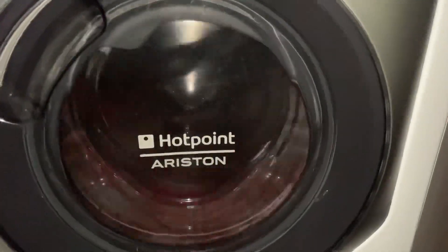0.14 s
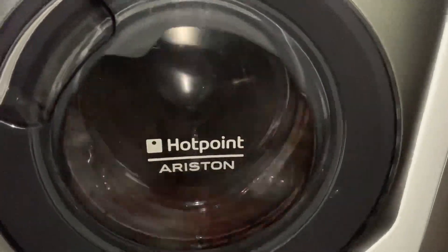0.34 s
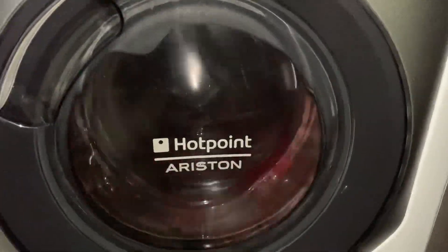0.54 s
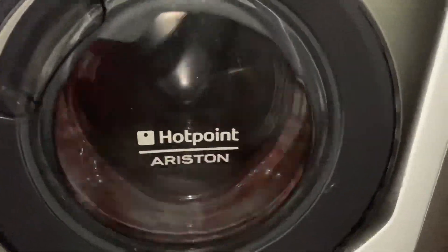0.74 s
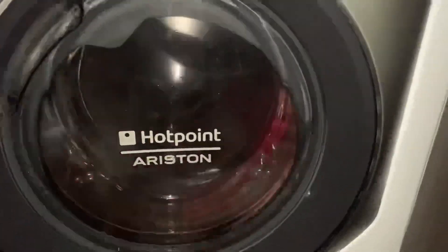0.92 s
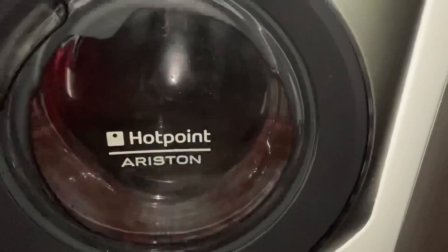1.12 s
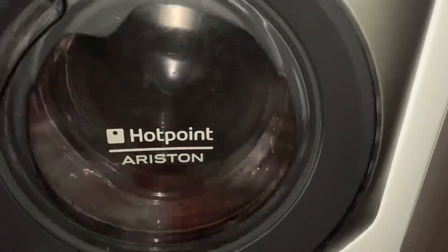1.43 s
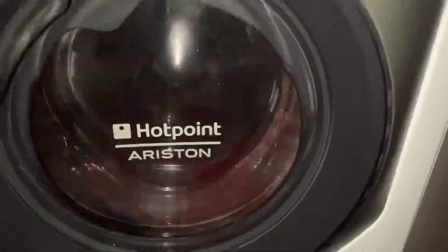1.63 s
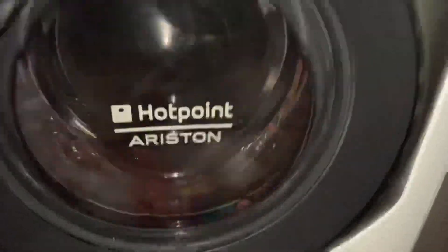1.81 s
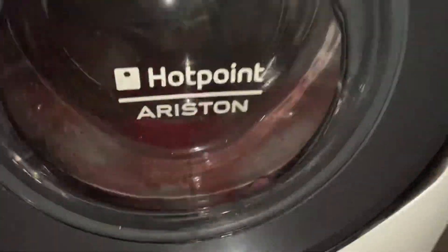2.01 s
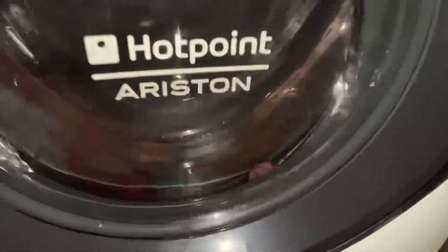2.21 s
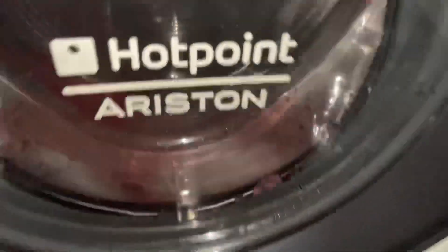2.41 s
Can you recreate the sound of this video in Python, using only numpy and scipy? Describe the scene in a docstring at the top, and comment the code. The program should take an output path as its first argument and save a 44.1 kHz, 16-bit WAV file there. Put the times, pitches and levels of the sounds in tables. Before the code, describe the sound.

Close at the door of a washing machine at home, a steady electric hum, thin whine and dull tub booms run under watery hiss, with an early metallic knock and tick, then sloshing swells and short splashes.

```python
"""A front-loading washing machine turns its drum, heard from just outside the door.
From the start the mains-fed motor hums and whines in thin tones and buzzes as noise bursts through the cabinet,
the tub rumbles and booms on low resonances as the wet load shifts, and patchy noise churns, runs and hisses.
Half a second in, something hard knocks the ringing drum, then ticks once more before the water gets lively.
From one second the laundry swishes round in swells of noise, water splashes in short sprays, and a last tick falls."""
import sys
import numpy as np
from scipy import signal
from scipy.fft import rfft, irfft, next_fast_len
from scipy.io import wavfile
from scipy.ndimage import uniform_filter1d, map_coordinates

SR = 44100
rng = np.random.default_rng(int(sys.argv[2]) if len(sys.argv) > 2 else 0)


def bounce(signal):
    """Save signal as a 16-bit WAV file at the path given by the first command-line argument."""
    frames = np.transpose(np.atleast_2d(signal))
    limited = np.clip(frames, -1, 1)
    pcm = np.round(limited * 32767).astype(np.int16)
    wavfile.write(sys.argv[1], SR, pcm)


N = 112455

MAINS_HZ = 50.03
# weak partials of the motor hum, before they follow the buzz: mains_multiple, level_db
WEAK_HUM = [(1, -71), (2, -74), (5, -54.5), (6, -52.5), (7, -64.5), (10, -59.5), (11, -57.5), (12, -54),
            (13, -59.5)]
# the two strongest hum partials: time_s, third_level_db, fourth_level_db
STRONG_HUM = [(0, -48, -36.5), (.38, -43, -34.5), (.56, -49, -35.5), (.65, -36, -44), (.73, -45, -45.5),
              (.8, -42, -58), (0.979, -44.5, -64.5), (1.07, -37, -39), (1.16, -52, -46.5),
              (1.3, -36.5, -42), (1.42, -46, -42), (1.7, -42, -45), (1.8, -33, -39), (1.93, -48, -42),
              (2.04, -33.5, -46), (2.16, -46.5, -41), (2.27, -33, -39.5), (2.55, -45, -40.5)]
# hum partial that rings in a panel, coming and going with the load: time_s, level_db
PANEL_SING = [(0, -47), (.08, -47), (.15, -54), (.22, -54), (.29, -53), (.44, -43.5), (.56, -63),
              (.69, -56), (.8, -47.5), (.95, -57.5), (1.07, -63), (1.24, -50.5), (1.32, -62.5),
              (1.42, -43.5), (1.56, -44.5), (1.63, -54), (1.74, -59), (1.86, -43.5), (1.94, -58),
              (2.01, -44.5), (2.1, -59), (2.22, -60.5), (2.42, -46), (2.55, -52)]
SING_MULTIPLE = 14  # of the mains
HUM_FOLLOWS = 0.81  # dB of weak hum for each dB of buzz
# unsteadiness of each kind of tone, in level (dB) and phase (radians)
HUM_WAVER_DB, HUM_WAVER_RAD = 3.5, 0.37
STRONG_WAVER_DB, STRONG_WAVER_RAD = 1.24, 0.068
SING_WAVER_DB, SING_WAVER_RAD = 1.2, 0.35
WHINE_WAVER_DB, WHINE_WAVER_RAD = 6.5, 0.45

# thin lines of the motor whine, before its overall level: pitch_hz, level_db
WHINE_LINES = [(904.4, -57.5), (958.2, -71), (1098, -70.5), (1180, -63), (1351, -64), (1389, -65),
               (1523, -61), (1685, -65.5), (2153, -66.5)]
# gain over all the whine lines: time_s, gain_db
WHINE_GAIN = [(0, 1), (.55, 3.5), (.85, -10), (1.1, -2.5), (1.6, -2), (1.92, -4), (2.2, -3), (2.55, -12)]

# motor buzz before its trim: time_s, level_db
BUZZ_LEVEL = [(0, -38), (.2, -37), (.3, -46.5), (.49, -39), (.56, -44), (.72, -44), (.785, -45.5),
              (.94, -47.5), (1.08, -41.5), (1.26, -42.5), (1.33, -48.5), (1.4, -43), (1.55, -42.5),
              (1.63, -42.5), (1.82, -43.5), (2.02, -43.5), (2.24, -44), (2.3, -41), (2.55, -42)]
BUZZ_TRIM_DB, BUZZ_SHARPNESS = -1.35, 1.32
# cabinet panel resonances: pitch_hz, width_hz (before widening), relative_level_db
CABINET_MODES = [(250.2, 17, -10), (357.7, 17, -3), (472.8, 30, -7), (506.6, 17.7, 0), (558.5, 33, -6.5),
                 (605.5, 12.6, -0.5), (669.4, 31.6, -2), (689.2, 25, -5.5), (784.3, 10.3, -5.5),
                 (918, 12, -9)]

# tub resonances: pitch_hz, width_hz (before widening), relative_level_db
TUB_MODES = [(53, 5.8, -2), (66.6, 16.7, -0.5), (73.5, 3.4, 3), (130.2, 20.4, -2), (160.7, 19, -4.5),
             (178, 22, -2.5), (216, 7.9, -14.5)]
TUB_RUMBLE_DB = -40.5
# shifts of the load that sound a tub or panel resonance: middle_s, half_length_s, level_db, pitch_hz
BOOMS = [(0.04, 0.068, -40, 124), (0.068, 0.022, -34.5, 76), (0.212, 0.053, -32.5, 73.8),
         (0.363, 0.019, -31, 79.4), (.37, 0.067, -43, 127.4), (0.463, 0.035, -34.5, 76.3),
         (0.714, 0.02, -35, 74), (0.79, 0.021, -46, 612), (1.037, 0.022, -36, 130.3),
         (1.259, 0.023, -34.5, 126.4), (1.309, 0.033, -31, 76), (1.79, 0.037, -46, 76.4),
         (1.806, 0.019, -39, 250.7), (1.953, 0.029, -39, 78.1), (2.027, .02, -42, 75.84),
         (2.195, 0.055, -39.5, 252), (2.2, 0.022, -35, 77), (2.308, 0.033, -43, 601.5),
         (2.42, 0.025, -30.5, 75), (2.522, 0.078, -42, 258.2), (2.525, 0.022, -36, 76)]

# low churning of the load before its trim: time_s, level_db
CHURN_LEVEL = [(0, -36), (.17, -39.5), (.36, -38.5), (.5, -43.5), (.9, -48.5), (1.03, -39), (1.13, -45.5),
               (1.28, -47), (1.45, -43.5), (1.64, -50), (1.82, -39.5), (1.96, -49), (2.2, -45), (2.28, -44),
               (2.45, -38), (2.55, -37)]
CHURN_TRIM_DB = -1
# water running through the load: time_s, level_db
WASH_LEVEL = [(0, -46), (.1, -45), (.53, -45.5), (.65, -49), (.87, -54.5), (1.0, -51.5), (1.22, -51),
              (1.4, -50.5), (1.7, -54), (1.97, -47.5), (2.3, -50), (2.55, -44.5)]
# fine hiss of water: time_s, level_db
HISS_LEVEL = [(0, -51), (.5, -52), (.7, -50), (.88, -54.5), (1.1, -52), (1.3, -52.5), (1.5, -49),
              (1.62, -52.5), (1.95, -50), (2.12, -53), (2.2, -49), (2.3, -50), (2.55, -51)]
# tone colour of churn, running water and hiss: frequency_hz, relative_level_db
CHURN_COLOUR = [(20, -22.5), (45, -17), (100, -24), (130, -0.5), (175, 7), (225, -6.5), (262, -2),
                (290, -0.5), (350, 1), (420, -4.5), (650, -7.5), (850, -13.5), (1500, -38), (4000, -62)]
WASH_COLOUR = [(200, -39.5), (600, -4.5), (1050, 1.5), (1500, -1), (1900, -6), (2600, -7), (4000, -24.5),
               (8000, -25), (15000, -56.5)]
HISS_COLOUR = [(300, -6.5), (1200, -10), (2000, -1), (2700, 4.5), (3600, -1.5), (4800, -4.5), (6400, -8.5),
               (7400, -14.5), (8600, -13), (11400, -30), (12400, -25.5), (15500, -34)]
PATCHY_DB = 2.5  # rms gain of the patches in all watery noise

# hard knocks on the drum: start_s, level_db, ring_t60_s, brightest_hz, width_octaves
KNOCKS = [(.5417, -36, 0.21, 4200, 1.5), (0.7654, -34, 0.082, 4860, 0.077), (2.192, -43, .12, 4800, 0.15)]
# what the drum rings with: pitch_hz, relative_level_db
DRUM_MODES = [(1505, 3.5), (2460, -5), (2686, -14), (3222, -16), (3660, 6.5), (3724, 1.5), (3810, 2),
              (4052, 2.5), (4500, -4.5), (4860, -13.5), (6215, 5), (7219, -7)]
# tone colour of the clatter: frequency_hz, relative_level_db
KNOCK_COLOUR = [(300, -29), (1500, 0), (2600, -1.5), (3650, 4), (4300, -1.5), (5500, -9), (6300, -7.5),
                (7000, 0), (8600, -6), (11500, -8.5), (13000, -18.5), (15500, -12.5)]
KNOCK_ATTACK_S, RING_DB = 0.0013, -4
CRACK_DB, CRACK_T60_S = -4.5, 0.0052
TAIL_DB, TAIL_T60_S = -20, 0.61

# laundry sliding over the drum: spray_peak_s, spray_level_db, slosh_level_db, rise_s, fall_s
SWISHES = [(1.045, -44.5, -42, 0.067, 0.1), (1.806, -45, -41, 0.081, .08), (2.455, -46, -45, 0.063, 0.058)]
# tone colour of the bright spray and the duller slosh: frequency_hz, relative_level_db
SPRAY_COLOUR = [(500, -15), (1400, -7.5), (2100, 3), (2700, -1), (3400, -3.5), (4200, -14), (6500, -17),
                (12000, -39)]
SLOSH_COLOUR = [(150, -5.5), (400, -9), (800, -1), (1200, 2.5), (1600, -4.5), (2100, -14), (3500, -21),
                (12000, -42)]
SLOSH_LAG_S = 0.032  # slosh after spray, so each swish grows darker

# water slapping the drum wall: start_s, level_db
SPLASHES = [(1.022, -50), (1.67, -45.5), (2.258, -39.5), (2.37, -42)]
# tone colour of the splashes: frequency_hz, relative_level_db
SPLASH_COLOUR = [(500, -23.5), (1600, -9), (2300, 1), (2700, 1), (3300, -3.5), (4000, -10.5), (8000, -33.5),
                 (12000, -59)]
SPLASH_RISE_S, SPLASH_T60_S = 0.0061, 0.12

# likeness of left and right: frequency_hz, coherence (0 to 1)
STEREO_LIKENESS = [(55, .99995), (100, .9985), (190, .996), (350, .9), (560, .72), (900, .74), (1060, .52),
                   (1550, .85), (2100, .85), (2550, .55), (3000, .2), (3700, .42), (4200, .55), (5000, .53),
                   (6100, .82), (7200, .78), (8000, .85), (8800, 1)]
# phase by which the left leads the right: frequency_hz, lead_rad
LEFT_LEAD = [(300, 0), (1800, 0), (2450, .5), (3050, 1.4), (3700, 1.0), (4200, .45), (5000, .45),
             (6100, 1.45), (7100, 1.95), (8000, 2.45), (8800, np.pi)]
TOP_HZ = 15760


def amp(db):
    """Decibels to gain."""
    return 10 ** (np.asarray(db) / 20)


def unit(x):
    """Scale to rms 1."""
    return x / np.sqrt(np.mean(x ** 2) + 1e-20)


def clock():
    """Seconds at each sample."""
    return np.arange(N) / SR


def along(points, hz):
    """Read (frequency, value) points on a log-frequency axis."""
    f, v = np.transpose(points)
    return np.interp(np.log(hz + 1), np.log(f + 1), v)


def curves(rows):
    """One value per sample for each column after the time."""
    s, *cols = np.transpose(rows)
    return [np.interp(clock(), s, c) for c in cols]


def wobble(rate):
    """A smooth random curve, rate knots a second."""
    knots = rng.standard_normal(4096)
    return map_coordinates(knots, [clock() * rate + 2], mode="wrap")


def filtered(x, response):
    """Shape x by a response of frequency, padded so its end does not wrap round."""
    m = next_fast_len(N + SR // 2)
    return irfft(rfft(x, m) * response(np.fft.rfftfreq(m, 1 / SR)), m)[..., :N]


def spread(pair, response):
    """Colour two unrelated signals and blend them into left and right, rms 1."""
    hz = np.fft.rfftfreq(N, 1 / SR)
    turn = np.arccos(np.clip(along(STEREO_LIKENESS, hz), -1, 1)) / 2
    common, apart = rfft(pair) * response(hz) * np.array([np.cos(turn), np.sin(turn)])
    lead = np.exp(.5j * along(LEFT_LEAD, hz))  # half the lead on each side
    sides = np.array([(common + apart) * lead, (common - apart) / lead])
    return unit(irfft(sides, N))


def resonances(table):
    """Summed response of steep-sided resonances, each a band-pass applied twice."""
    def response(f):
        total = 0
        for centre, width, db in table:
            damping = 1j * f * 1.5 * width  # widened, as squaring narrows the peak
            total = total + amp(db) * (damping / (centre ** 2 - f ** 2 + damping)) ** 2
        return total
    return response


def rush(colour, grain_db):
    """Watery stereo noise with patches of random gain and a fine grain."""
    z = signal.stft(rng.standard_normal((2, N)), nperseg=1024)[2]
    field = uniform_filter1d(rng.standard_normal(z.shape[1:]), size=3, axis=0)  # across frequency
    field = uniform_filter1d(field, size=9, axis=1)  # across time
    pair = signal.istft(z * amp(PATCHY_DB * unit(field)), nperseg=1024)[1][:, :N]
    grain = amp(grain_db * wobble(400))
    return spread(pair * grain, lambda hz: amp(along(colour, hz)))


def partial(hz, waver_db, waver_rad):
    """One slightly unsteady tone of the motor, rms 1."""
    phase = 2 * np.pi * (hz * clock() + rng.random()) + waver_rad * wobble(9.1)
    return unit(np.sin(phase) * amp(waver_db * wobble(18)))


def motor_hum():
    """Mains harmonics: weak ones swell with the buzz, third and fourth trade strength, one rings in a panel."""
    buzz_db, = curves(BUZZ_LEVEL)
    weak = sum(amp(db) * partial(round(k) * MAINS_HZ, HUM_WAVER_DB, HUM_WAVER_RAD) for k, db in WEAK_HUM)
    weak_swell = amp(HUM_FOLLOWS * (buzz_db - buzz_db.mean()))
    strong = 0
    for k, db in zip((3, 4), curves(STRONG_HUM)):
        strong = strong + amp(db) * partial(k * MAINS_HZ, STRONG_WAVER_DB, STRONG_WAVER_RAD)
    sing = partial(SING_MULTIPLE * MAINS_HZ, SING_WAVER_DB, SING_WAVER_RAD)
    return weak_swell * weak + strong + amp(curves(PANEL_SING)[0]) * sing


def motor_whine():
    """Thin lines of the turning motor, fixed in pitch and wavering in level."""
    lines = sum(amp(db) * partial(hz, WHINE_WAVER_DB, WHINE_WAVER_RAD) for hz, db in WHINE_LINES)
    return amp(curves(WHINE_GAIN)[0]) * lines


def motor_buzz():
    """A rough burst of torque in every mains cycle shakes the cabinet panels."""
    bursts = np.exp(BUZZ_SHARPNESS * np.cos(2 * np.pi * MAINS_HZ * clock()))
    rough = bursts * rng.standard_normal((2, N))
    return amp(curves(BUZZ_LEVEL)[0] + BUZZ_TRIM_DB) * spread(rough, resonances(CABINET_MODES))


def tub():
    """The tub's resonances rumble all along, and tones boom when the load shifts."""
    t = clock()
    rumble = amp(TUB_RUMBLE_DB) * spread(rng.standard_normal((2, N)), resonances(TUB_MODES))
    booms = np.zeros(N)
    for middle, half, db, hz in BOOMS:
        swell = np.exp(-((t - middle) / half) ** 2 / 2)
        tone = np.sqrt(2) * np.sin(2 * np.pi * (hz * t + rng.random()))  # rms 1
        booms += amp(db) * swell * tone
    return rumble + booms


def wet_load():
    """Low churning, running water and fine hiss, each a band of patchy noise."""
    churn = amp(curves(CHURN_LEVEL)[0] + CHURN_TRIM_DB) * rush(CHURN_COLOUR, grain_db=1.0)
    wash = amp(curves(WASH_LEVEL)[0]) * rush(WASH_COLOUR, grain_db=-1)
    hiss = amp(curves(HISS_LEVEL)[0]) * rush(HISS_COLOUR, grain_db=-0.36)
    return churn + wash + hiss


def drum_ring(t):
    """The drum's ringing modes, roughened in phase and drawn afresh for each of two signals."""
    modes = np.zeros((2, N))
    for side in range(2):
        for hz, db in DRUM_MODES:
            phase = 2 * np.pi * (hz * t + rng.random()) + 1.6 * wobble(110)
            modes[side] += amp(db) * np.sin(phase)
    return spread(modes, np.ones_like)


def knocks():
    """A sharp crack, the drum's ringing modes and a dense clatter that dies away inside it."""
    out = np.zeros((2, N))
    for start, db, t60, bright_hz, octaves in KNOCKS:
        t = np.maximum(clock() - start, 0)
        clatter = spread(rng.standard_normal((2, N)), lambda hz: amp(along(KNOCK_COLOUR, hz)))
        attack = 1 - np.exp(-t / KNOCK_ATTACK_S)  # silent before the knock
        crack = amp(CRACK_DB - 60 * t / CRACK_T60_S)
        fade = amp(-60 * t / t60)
        tail = amp(TAIL_DB - 60 * t / TAIL_T60_S)
        blow = attack * (amp(RING_DB) * drum_ring(t) * fade + clatter * (crack + fade + tail))
        # a narrow band leaves a tick, a broad one a full knock
        band = lambda hz: (1 + (np.log2((hz + 1) / bright_hz) / octaves) ** 2) ** -.5
        out += amp(db) * filtered(blow, band)
    return out


def swishes():
    """Once a turn the laundry slides over the drum: a bright spray first, a duller slosh just after."""
    spray, slosh = np.zeros(N), np.zeros(N)
    for peak, spray_db, slosh_db, rise, fall in SWISHES:
        swell = lambda t: np.exp(-np.maximum(-t / rise, t / fall))  # pointed at the peak
        spray += amp(spray_db) * swell(clock() - peak)
        slosh += amp(slosh_db) * swell(clock() - peak - SLOSH_LAG_S)
    return spray * rush(SPRAY_COLOUR, grain_db=1.5) + slosh * rush(SLOSH_COLOUR, grain_db=1.5)


def splashes():
    """Short bright sprays of water thrown against the drum wall, quick to rise and dying away."""
    level = np.zeros(N)
    for start, db in SPLASHES:
        t = np.maximum(clock() - start, 0)
        level += (1 - np.exp(-t / SPLASH_RISE_S)) * amp(db - 60 * t / SPLASH_T60_S)
    return level * rush(SPLASH_COLOUR, grain_db=-3.5)


def scene():
    """The whole machine: motor, tub and load, then knocks and moving water."""
    motor = motor_hum() + motor_whine() + motor_buzz()
    return motor + tub() + wet_load() + knocks() + swishes() + splashes()


def record(dry):
    """Keep nothing at or above the band limit."""
    return filtered(dry, lambda hz: hz < TOP_HZ)


dry = scene()
out = record(dry)
bounce(out)
```